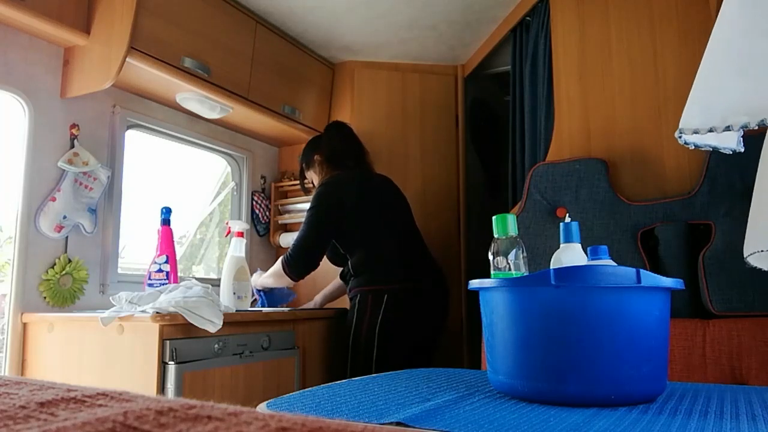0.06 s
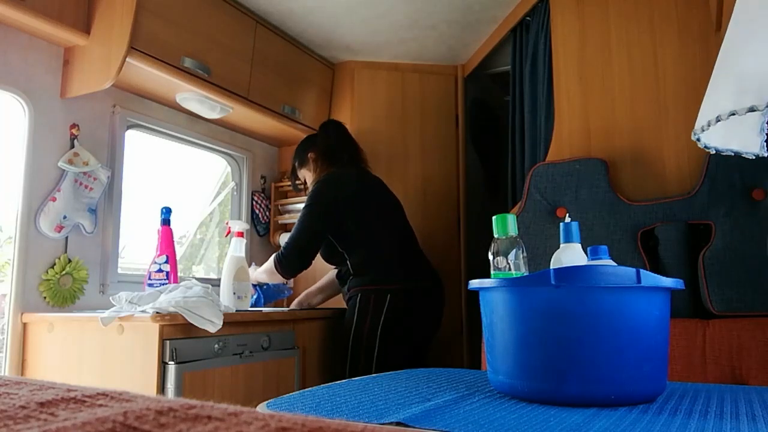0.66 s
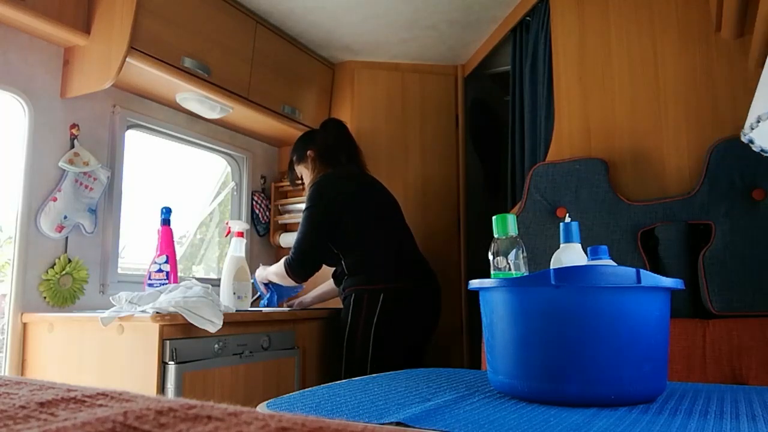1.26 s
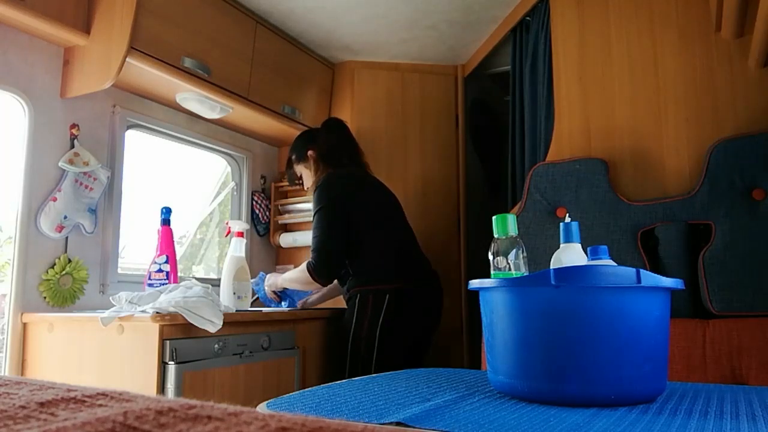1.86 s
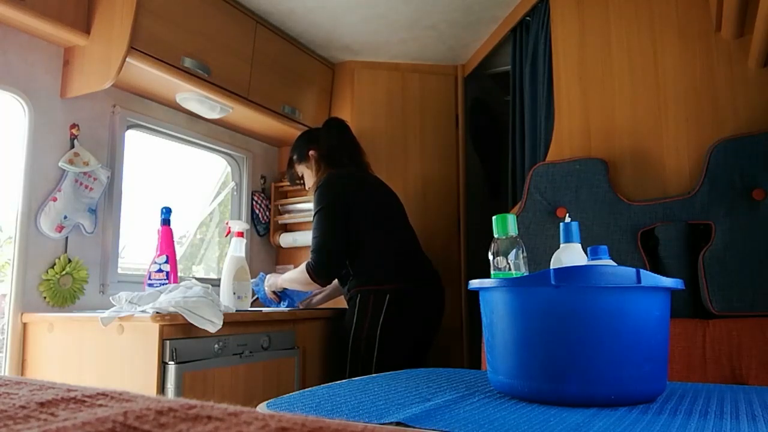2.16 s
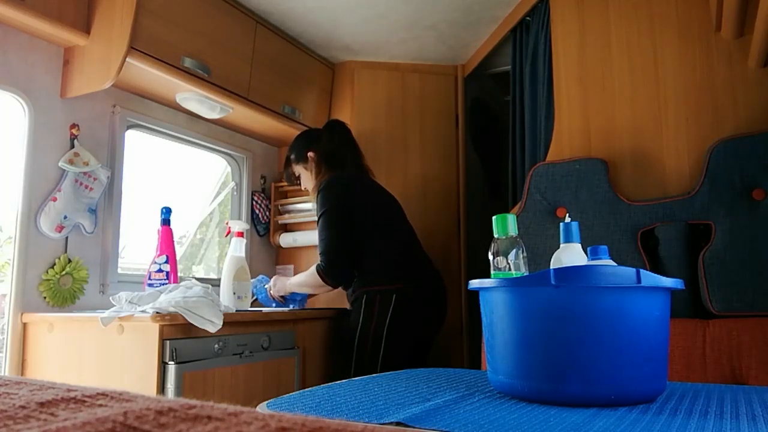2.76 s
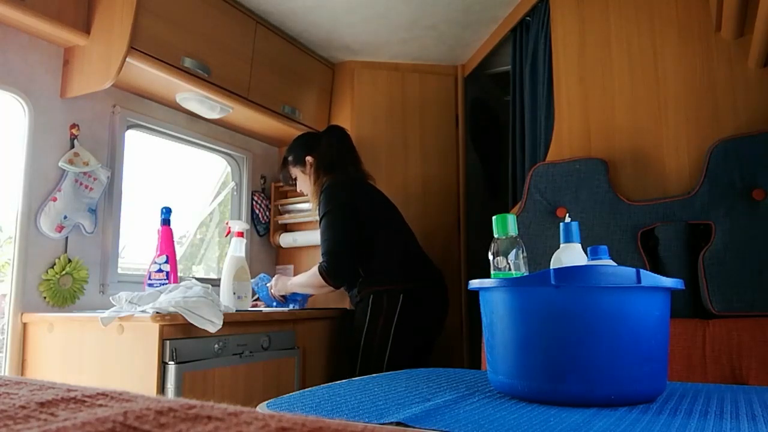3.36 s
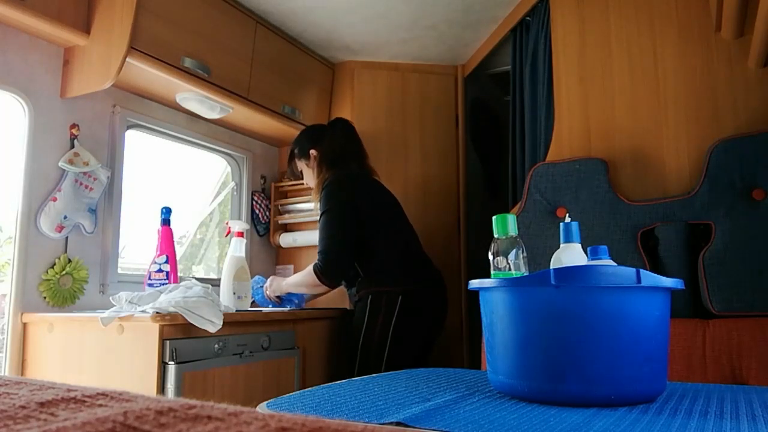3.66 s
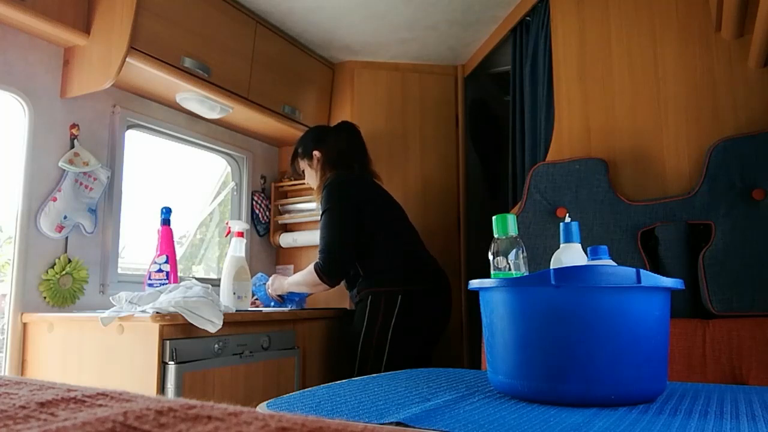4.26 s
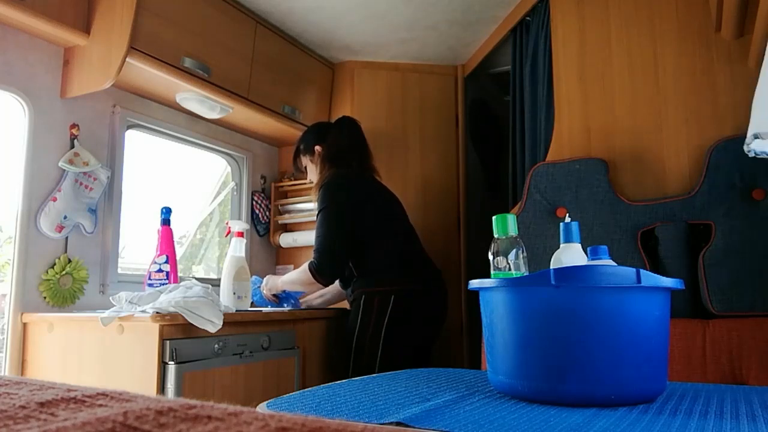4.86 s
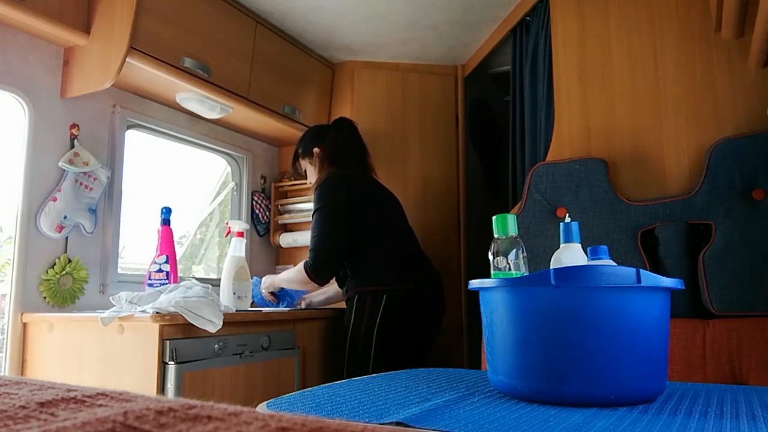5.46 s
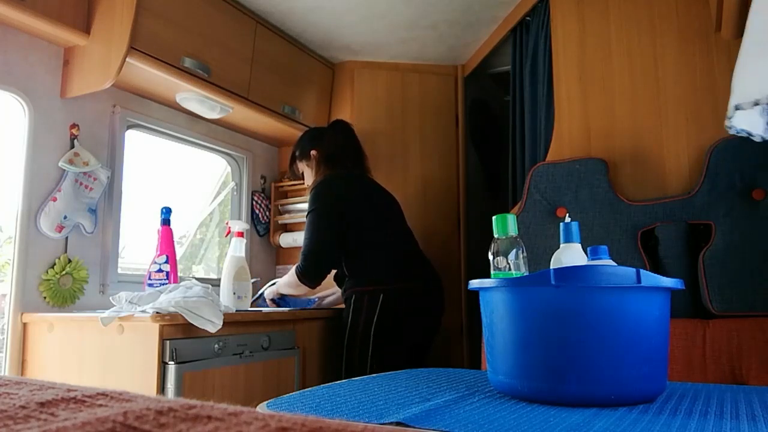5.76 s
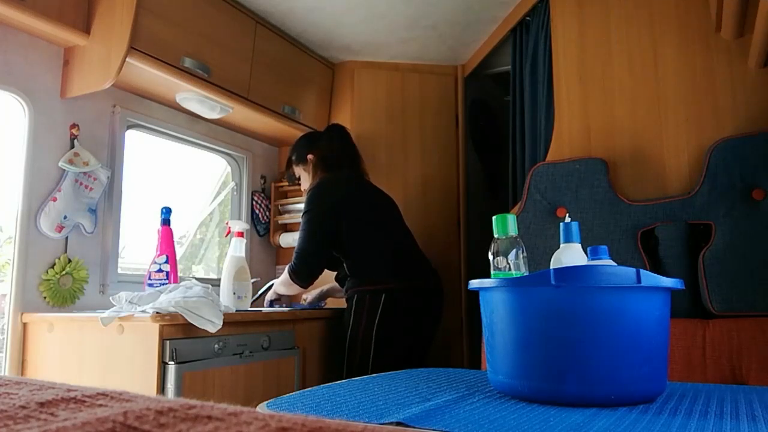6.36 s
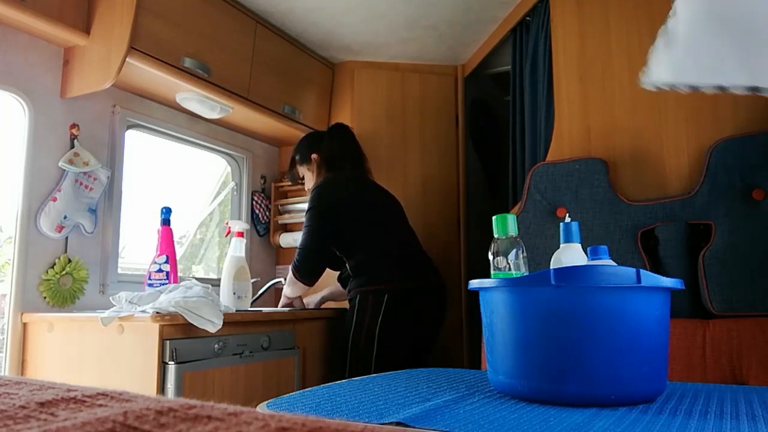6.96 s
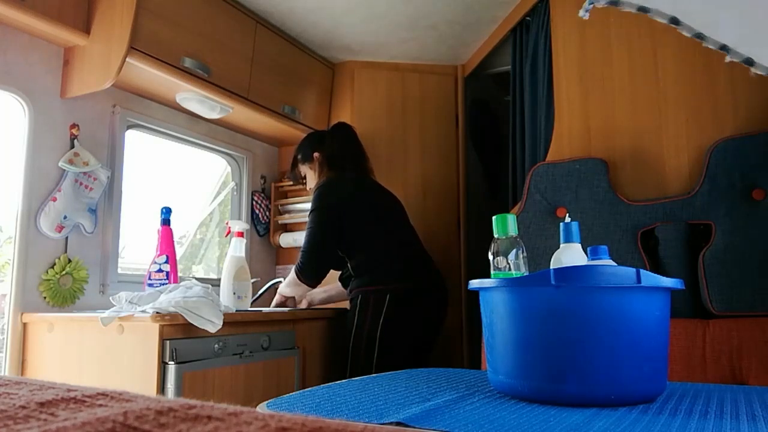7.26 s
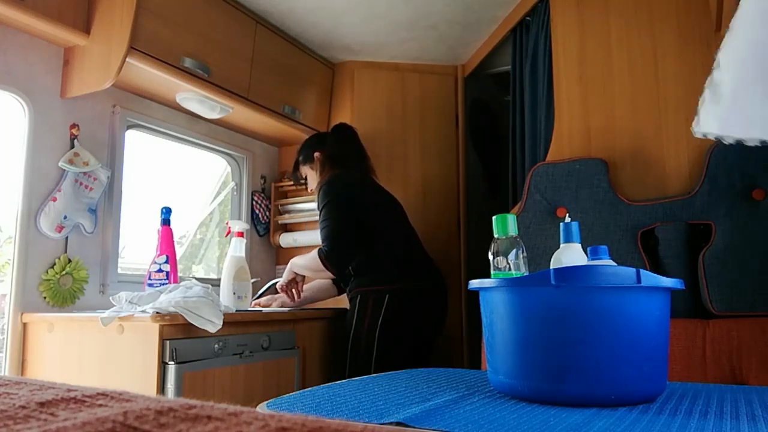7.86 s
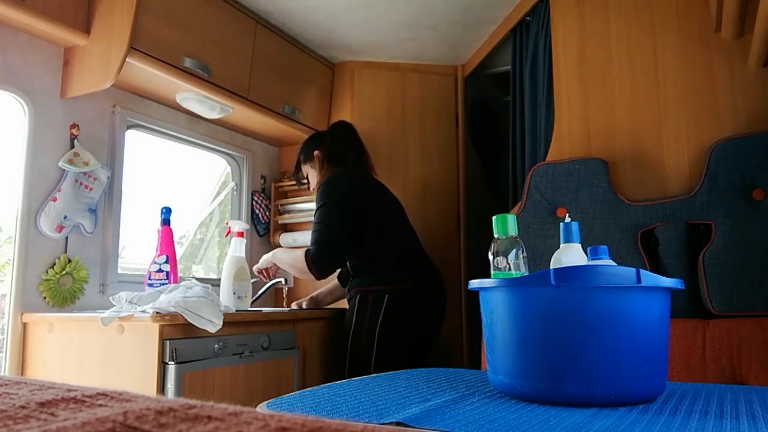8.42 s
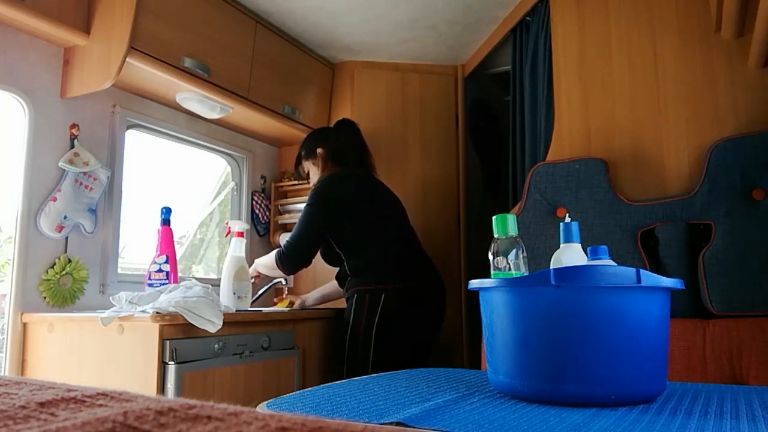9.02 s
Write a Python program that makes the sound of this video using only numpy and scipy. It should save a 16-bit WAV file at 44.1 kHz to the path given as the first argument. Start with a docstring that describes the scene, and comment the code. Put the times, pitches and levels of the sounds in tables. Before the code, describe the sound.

A small electric water pump hums evenly inside a camper for the whole nine seconds, low pitched, with a fast throb and a slight casing rattle. It is the main sound. Under it a tap hisses thinly into a sink, with scattered drips and small sloshes, clearest around 0.6, 1.9, 5.6 and 7 seconds. A wet cloth wipes very softly at about 1.7, 3.1, 5.5 and 8 seconds. Light knocks ring the basin briefly near 2.9, 6.7 and 7 seconds. Shifts of weight send dull, deep thuds and a swaying rumble through the van during the first second and again between 5.5 and 7 seconds. Small birds outside add faint, high chirps and short falling whistles throughout. The cabin sounds small and fairly dry, with a quiet low rumble of air behind everything.

```python
"""Water pump and sink in a camper

A small electric pump hums and throbs under the worktop, five uneven strokes a turn, its casing rattling.
Someone rinses and wipes the sink: the tap hisses thinly, water splashes, knocks ring the basin.
Shifts of weight make the van thud and sway on its springs. Small birds chirp faintly outside."""
import sys
import numpy as np
from scipy import signal
from scipy.fft import rfft, irfft
from scipy.io import wavfile
from scipy.ndimage import uniform_filter1d

SR = 44100
rng = np.random.default_rng(int(sys.argv[2]) if len(sys.argv) > 2 else 0)


def bounce(signal):
    """Save signal as a 16-bit WAV file at the path given by the first command-line argument."""
    frames = np.transpose(np.atleast_2d(signal))
    limited = np.clip(frames, -1, 1)
    pcm = np.round(limited * 32767).astype(np.int16)
    wavfile.write(sys.argv[1], SR, pcm)


N = 400869
T = np.arange(N) / SR


def undb(db):
    """Decibels to gain."""
    return 10 ** (np.asarray(db) / 20)


def level(x, db):
    """Scale to an rms level."""
    return x * undb(db) / np.sqrt(np.mean(x ** 2))


def colour(x, points):
    """Filter by a spectrum of (Hz, dB) points."""
    hz, db = np.transpose(points)
    f = np.fft.rfftfreq(x.shape[-1], 1 / SR) + 1
    return irfft(rfft(x) * undb(np.interp(np.log(f), np.log(hz), db)), x.shape[-1])


def band(x, hz, width_hz):
    """Band-pass, bell-shaped in octaves; output rms 1."""
    f = np.fft.rfftfreq(x.shape[-1], 1 / SR) + 1
    bell = np.exp(-.5 * np.abs(2 * np.log(f / hz) * hz / width_hz) ** np.e)
    return level(irfft(rfft(x) * bell, x.shape[-1]), 0)


def add(out, at_s, x):
    """Mix x into out from at_s."""
    i = max(int(at_s * SR), 0)
    out[..., i:i + x.shape[-1]] += x[..., :max(N - i, 0)]


def drift(rate_hz):
    """Smooth random signal, deviation near 1."""
    hold = int(SR / rate_hz)
    steps = np.repeat(rng.standard_normal(N // hold + 1), hold)
    return 1.307 * uniform_filter1d(uniform_filter1d(steps, hold), hold)[:N]


def swell(t, rise_s, decay_s):
    """Smooth rise to 1, exponential fall."""
    rise = np.sin(np.pi / 2 * np.minimum(t / rise_s, 1)) ** 2
    return rise * np.exp(-np.maximum(t - rise_s, 0) / decay_s)


def room(x, t60_s, direct_db):
    """Direct sound plus a diffuse stereo tail; power preserved."""
    t = T[:SR // 2]
    response = rng.standard_normal((2, len(t))) * np.exp(-np.log(1000) * t / t60_s)
    response /= np.sqrt(np.sum(response ** 2, axis=1, keepdims=True))
    response[:, 0] += undb(direct_db)
    return signal.fftconvolve(x[None], response, axes=1)[:, :N] / np.sqrt(1 + undb(direct_db) ** 2)


def place(x, left_db, side_db):
    """Set stereo balance and width."""
    mid, side = (x[0] + x[1]) / 2, (x[0] - x[1]) / 2 * undb(side_db)
    return np.array([(mid + side) * undb(left_db / 2), (mid - side) * undb(-left_db / 2)])


# Cabin air spectrum (frequency [Hz], relative density [dB])
AIR_SPECTRUM = [(15, 20), (28, 26), (45, 22.5), (70, 32), (150, 26.5), (300, 20), (450, 5.5), (900, 2),
                (2000, 0.5), (4000, -0.5), (8000, -9.5), (11000, -10), (16000, -10)]


def cabin_air(level_db=-60, flicker_db=1.5):
    """Steady air: rumble alike on both sides, hiss wide."""
    mid, side = rng.standard_normal((2, N))
    side = colour(side, [(100, -50), (500, 3.0), (16000, -3.5)])
    air = colour(np.array([mid + side, mid - side]), AIR_SPECTRUM)
    return level(air, level_db) * undb(flicker_db * drift(5.4))


# Pitch contours (position in call [0-1], offset from base pitch [octaves])
CHIRP_GLIDE = [(0, 0), (1, -.11)]
SLUR_GLIDE = [(0, 0), (.35, -.13), (1, -0.56)]
HOOK_GLIDE = [(0, -0.034), (.4, -.13), (1, .2)]
# Raspy calls (time [s], length [s], base pitch [Hz], relative level [dB])
SAGGING_CHIRPS = [(.345, 0.035, 4420, -63.5), (.595, .093, 4660, -62), (1.12, .19, 4890, -63.5),
                  (1.579, 0.042, 3810, -54), (1.763, 0.072, 4290, -54.5), (2.593, 0.11, 4260, -60.5),
                  (3.049, 0.099, 3370, -62), (4.497, 0.14, 4200, -58), (4.62, 0.091, 5250, -63.5),
                  (4.64, .22, 4100, -69), (4.959, 0.13, 4410, -64), (5.42, 0.056, 3280, -62),
                  (5.73, 0.063, 4730, -59), (6.344, .15, 4170, -57.5), (6.693, .055, 4860, -60.5),
                  (7.09, .093, 4250, -64), (7.5, 0.21, 4980, -67), (8.336, .069, 5480, -62),
                  (8.765, 0.051, 4730, -56), (8.835, .1, 4180, -60.5), (8.986, 0.12, 4670, -63)]
FALLING_SLURS = [(.018, 0.068, 5110, -60.5), (.675, 0.1, 5400, -59), (.74, 0.1, 4240, -57),
                 (3.269, 0.12, 4370, -59.5), (3.444, 0.11, 4280, -61.5), (3.68, 0.083, 3980, -65.5),
                 (4.263, 0.17, 4640, -59.5), (5.044, 0.091, 6450, -68), (5.105, 0.1, 4350, -57),
                 (6.14, 0.11, 4240, -64), (6.777, .18, 4560, -62), (7.007, .1, 4190, -58.5),
                 (7.725, 0.12, 4650, -57), (7.842, 0.09, 4430, -57.5), (8.418, .085, 5020, -62)]
# High whistles that dip, then rise (time [s], relative level [dB])
HOOK_WHISTLES = [(4.985, -60), (5.77, -59), (6.811, -61.5), (7.825, -62), (8.805, -58.5)]


def birds(buzz_hz=110, hook_s=.056, hook_hz=6230, gain_db=-2):
    """Gliding whistles with a raspy buzz in the pitch, smeared by window and yard reflections."""
    out, rasp = np.zeros(N), .7 * drift(500)
    hooks = [(at_s, hook_s, hook_hz, db) for at_s, db in HOOK_WHISTLES]
    kinds = [(SAGGING_CHIRPS, CHIRP_GLIDE, 221), (FALLING_SLURS, SLUR_GLIDE, 274), (hooks, HOOK_GLIDE, 30)]
    for calls, glide, depth_hz in kinds:
        for at_s, length_s, base_hz, db in calls:
            t = T[:int(length_s * SR)]
            offset, speed = rng.random(), 1 + .1506 * rng.standard_normal()
            buzz = np.sin(2 * np.pi * (buzz_hz * speed * t + offset))
            buzz += rasp[int(offset * N / 2):][:len(t)]
            hz = base_hz * 2 ** np.interp(t / length_s, *np.transpose(glide)) + depth_hz * buzz
            whistle = np.sqrt(2) * np.sin(2 * np.pi * np.cumsum(hz) / SR)
            add(out, at_s, undb(db + gain_db) * whistle * np.sin(np.pi * t / length_s))
    window = undb(-4.5) * room(out, t60_s=.06, direct_db=-7)
    yard = undb(-3.5) * room(out, t60_s=.7, direct_db=-25)
    return place(window + yard, left_db=3, side_db=.5)


# Thuds and sway (time [s], frequency [Hz], rise [s], decay [s], peak level [dB])
BODY_SWINGS = [(0, 59.3, .03, 0.14, -49.5), (.58, 56.3, 0.16, 0.65, -49), (.9, 73, 0.024, .035, -38.5),
               (2.32, 62, .03, .05, -55), (5.58, 20.9, 0.055, 0.31, -40), (5.989, 79, 0.015, 0.032, -44),
               (6.84, 23.8, 0.037, 0.15, -40.5), (7.027, 71, 0.023, .03, -40)]


def van_thuds():
    """Floor, panels and springs answer each shift of weight with a low, damped oscillation."""
    out, t = np.zeros(N), T[:2 * SR]
    for at_s, hz, rise_s, decay_s, db in BODY_SWINGS:
        add(out, at_s, undb(db) * np.sin(2 * np.pi * hz * t) * swell(t, rise_s, decay_s))
    return out


# Basin resonances (frequency [Hz], gain [dB], t60 [s])
BASIN_MODES = [(447, 16, 0.19), (520, -1, .2), (750, 3, 0.12), (900, -7, .14), (1060, 0, 0.11),
               (1347, 11, 0.069), (1383, 1.5, 0.25), (1530, 10, 0.12), (1675, 9, 0.15), (2077, 10.5, 0.22),
               (3060, 2, 0.13)]
# Blows (time [s], relative level [dB], centre [Hz], spread [octaves])
BASIN_BLOWS = [(2.925, -63, 1410, 0.074), (3.024, -87, 2050, 0.13), (6.701, -64, 1060, 0.11),
               (6.705, -69, 1800, 0.12), (6.78, -73, 800, 0.41), (7.002, -61, 710, 0.9)]


def basin_knocks(contact_s=.007, scrape_db=-8, scrape_decay_s=.11):
    """A scuffing contact rings the basin; where it lands favours some modes."""
    out, t = np.zeros(N), T[:SR // 2]
    for at_s, db, centre_hz, spread_oct in BASIN_BLOWS:
        ring = 0
        for hz, mode_db, t60_s in BASIN_MODES:
            weight = undb(mode_db) * np.exp(-.5 * (np.log2(hz / centre_hz) / spread_oct) ** 2)
            decay = np.exp(-np.log(1000) * t / t60_s)
            ring += weight * np.sin(2 * np.pi * (hz * t + rng.random())) * decay
        scrape = band(rng.standard_normal(len(t)), centre_hz, centre_hz * (.5 + spread_oct))
        scrape *= undb(scrape_db) * np.exp(-t / scrape_decay_s)
        add(out, at_s, undb(db) * (ring + scrape) * np.minimum(t / contact_s, 1))
    return room(out, t60_s=.14, direct_db=20)


# Cloth strokes (time [s], length [s], level [dB])
CLOTH_STROKES = [(1.718, 0.42, -66), (3.14, .85, -70.5), (5.473, .5, -73), (7.978, 0.7, -71.5)]


def cloth_wipes(centre_hz=6770, width_hz=3300):
    """A wet cloth hisses over the basin, loudest mid-stroke."""
    envelope = np.zeros(N)
    for at_s, length_s, db in CLOTH_STROKES:
        t = T[:int(length_s * SR)]
        add(envelope, at_s, undb(db) * np.sqrt(np.sin(np.pi * t / length_s)))
    return envelope * band(rng.standard_normal((2, N)), centre_hz, width_hz)


# Drops flung at the basin (time [s], centre [Hz], level [dB])
FLUNG_DROPS = [(.292, 5500, -64), (.601, 7450, -55.5), (1.402, 5540, -58.5), (1.43, 6900, -62),
               (1.895, 7750, -55.5), (1.988, 8200, -64), (4.249, 6700, -65.5), (5.109, 7700, -62),
               (5.563, 6050, -50.5), (6.187, 6400, -64), (7.32, 8100, -67), (7.905, 8860, -62)]
# Sloshes (time [s], length [s], level [dB])
BASIN_SLOSHES = [(.05, 0.043, -66), (0.656, 0.077, -62), (1.84, .13, -56), (2.098, 0.073, -62.5),
                 (2.886, 0.076, -61.5), (5.594, .1, -59.5), (5.819, .05, -59), (6.787, .04, -59),
                 (7.002, .04, -55.5)]
# Air pockets (time [s], level [dB])
AIR_GULPS = [(1.899, -64), (5.65, -64)]


def splashes(grain_db=3, grain_samples=64):
    """Grainy bursts of spray: drops spit, sloshes swell and drain, air pockets gulp."""
    out, t = np.zeros((2, N)), T[:SR]

    def burst(at_s, db, hz, width_hz, rise_s, decay_s):
        """Band of grainy noise, half risen at at_s."""
        grain = np.repeat(rng.uniform(-1, 1, len(t)), grain_samples)[:len(t)]
        spray = rng.standard_normal((2, len(t))) * undb(grain_db * grain)
        add(out, at_s - rise_s / 2, undb(db) * band(spray, hz, width_hz) * swell(t, rise_s, decay_s))

    for at_s, hz, db in FLUNG_DROPS:
        burst(at_s, db, hz, width_hz=.42 * hz, rise_s=.0033, decay_s=.019)
    for at_s, length_s, db in BASIN_SLOSHES:
        burst(at_s, db, hz=4980, width_hz=4800, rise_s=.42 * length_s, decay_s=.58 * length_s)
    for at_s, db in AIR_GULPS:
        burst(at_s, db, hz=1750, width_hz=510, rise_s=.025, decay_s=.03)
    return out


# Flow over hands and cloth (time [s], relative level [dB])
TAP_FLOW = [(0.0, -77.5), (1.41, -79.5), (2.0, -78), (2.17, -79.5), (2.96, -81.5), (3.67, -76),
            (3.9, -79.5), (5.49, -80.5), (5.72, -76), (6.56, -81), (6.89, -76), (7.54, -82), (8.18, -78.5),
            (9.09, -79)]
# Spray spectrum (frequency [Hz], relative density [dB])
SPRAY_SPECTRUM = [(1000, -4.5), (2500, -10), (4000, -3.5), (5500, -6.5), (7000, -5), (9500, -9),
                  (11000, -14.5), (16000, -20)]


def tap(gain_db=10.5, drops_db=-6, drops_per_s=1200, spread_db=4.5, flicker_db=1.5):
    """A thin jet hisses and breaks into droplets that tick in the basin."""
    flow_db = np.interp(T, *np.transpose(TAP_FLOW))
    sizes = undb(spread_db * np.minimum(rng.exponential(size=N), 4)) * rng.standard_normal(N)
    drops = room(sizes * (rng.random(N) < drops_per_s / SR), t60_s=.017, direct_db=-4)
    spray = rng.standard_normal((2, N)) + level(drops, drops_db)
    return level(colour(spray, SPRAY_SPECTRUM), gain_db) * undb(flow_db + flicker_db * drift(30))


SHAFT_HZ = 22.539
# Casing spectrum (frequency [Hz], relative density [dB])
CASING_SPECTRUM = [(300, -62), (430, 2), (540, -8), (640, -3.5), (760, 1.5), (920, -15.5), (1200, -5.5),
                   (1800, -12.5), (2150, -9), (2330, -8), (2500, -19), (3200, -18), (6000, -29)]
# Valve ticks (phase [turns], spread [turns], centre [Hz], width [Hz], level [dB])
VALVE_TICKS = [(0.89, 0.1, 750, 150, -76), (0.07, 0.12, 2315, 160, -85.5)]


def pump_rattle(turns, casing_db=-70.5, uneven_db=1.5):
    """The casing chatters alike on every turn; the valves tick once a turn, never alike."""
    turn_samples = int(SR / SHAFT_HZ)
    grid = np.arange(turn_samples) / turn_samples
    chatter = np.array([np.interp(turns % 1, grid, rng.standard_normal(turn_samples)) for _ in range(2)])
    out = level(colour(chatter, CASING_SPECTRUM), casing_db)
    for phase, spread, hz, width_hz, db in VALVE_TICKS:
        offset = (turns - phase + .5) % 1 - .5
        gate = np.exp(-.5 * (offset / spread) ** 2) * undb(uneven_db * drift(SHAFT_HZ))
        out += undb(db) * band(gate * rng.standard_normal((2, N)), hz, width_hz)
    return out


# Hum lines, motor whine last (order [x shaft rate], relative level [dB])
HUM_LINES = [(3, -22.5), (4, -21.5), (5, 1), (6, -16.5), (7, -18.5), (8, -41), (9, -29), (10, -29.5),
             (11, -28.5), (12, -38), (13, -28), (14, -18), (15, -23.5), (16, -36), (17, -36.5), (24, -43),
             (48, -60), (100, -59)]
# Paths via air, floor, cupboard panels (lowest order [x shaft rate], delay [turns], left lag [s])
HUM_PATHS = [(0, 0, .0004), (7, .014, .00048), (14, .68, .00062)]


def pump_hum(turns, level_db=-38.5, air_waver_db=.34, wood_waver_db=.92):
    """Five strokes a turn make the hum; their unequal strength adds neighbouring lines and the throb."""
    out = np.zeros((2, N))
    for order, db in HUM_LINES:
        _, delay, lag_s = [path for path in HUM_PATHS if order >= path[0]][-1]
        stereo_turns = turns - delay - np.array([[.5], [-.5]]) * lag_s * SHAFT_HZ
        # Lines passing through loose woodwork waver more.
        waver_db = (wood_waver_db if delay else air_waver_db) * drift(14)
        out += undb(db + waver_db) * np.cos(2 * np.pi * order * stereo_turns)
    return level(out, level_db)


def scene(first_turn_s=.002, wander_turns=.0025):
    """The pump runs evenly throughout the washing and the birdsong."""
    turns = SHAFT_HZ * (T - first_turn_s) + wander_turns * drift(1.996)
    water = place(tap() + splashes() + cloth_wipes(), left_db=.5, side_db=2.5)
    pump = pump_hum(turns) + pump_rattle(turns)
    return pump + water + basin_knocks() + van_thuds() + birds() + cabin_air()


def record(dry, cutoff_hz=15700):
    """Steep elliptic low-pass."""
    return signal.sosfilt(signal.ellip(10, .1, 80, cutoff_hz, fs=SR, output="sos"), dry)


dry = scene()
out = record(dry)
bounce(out)
```